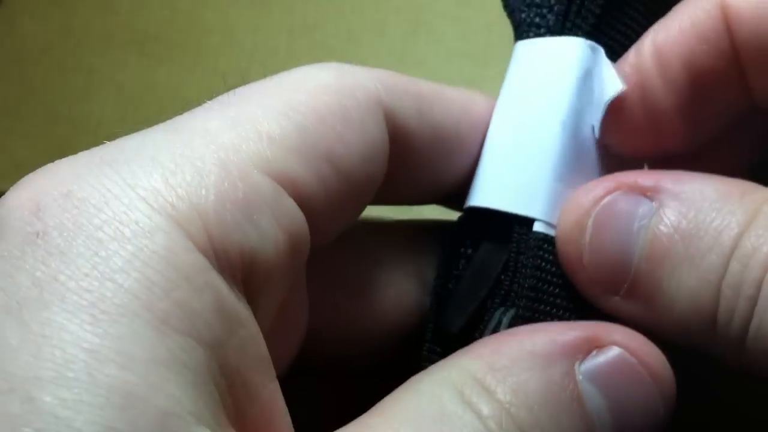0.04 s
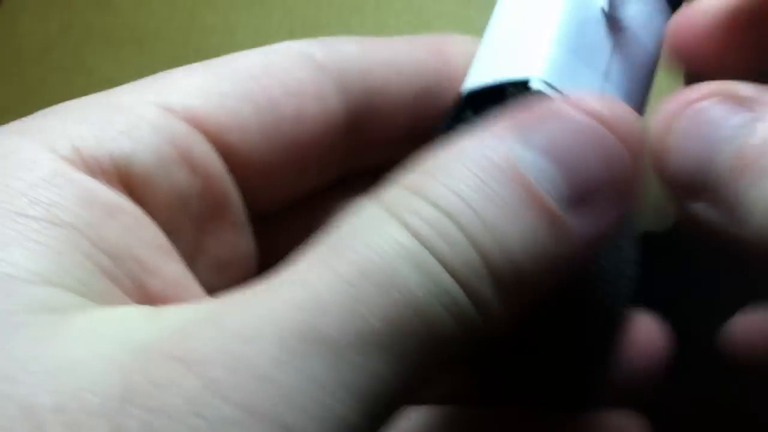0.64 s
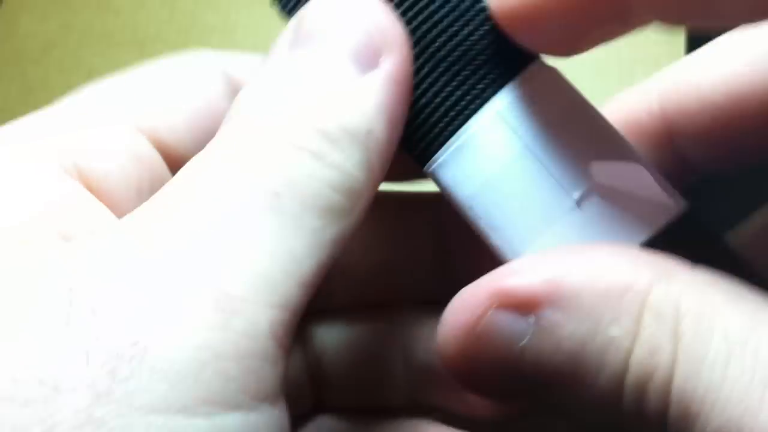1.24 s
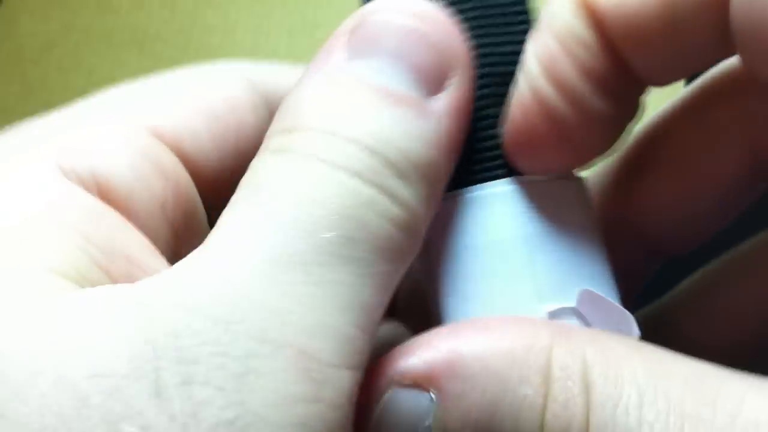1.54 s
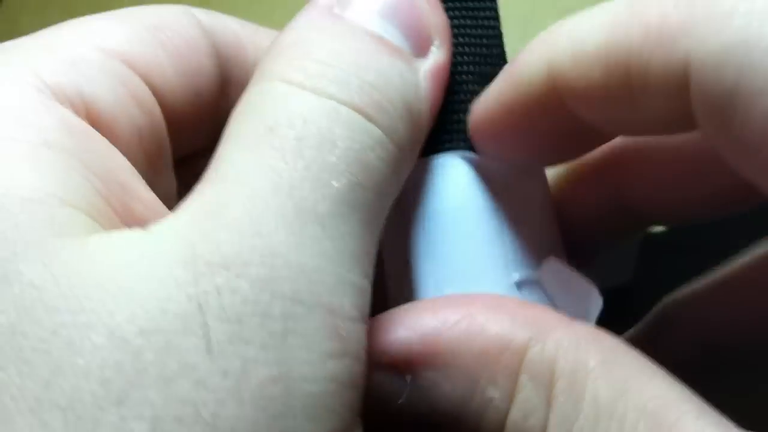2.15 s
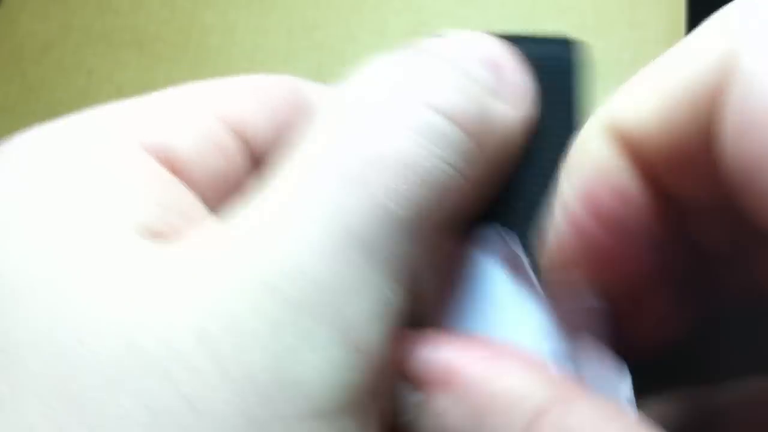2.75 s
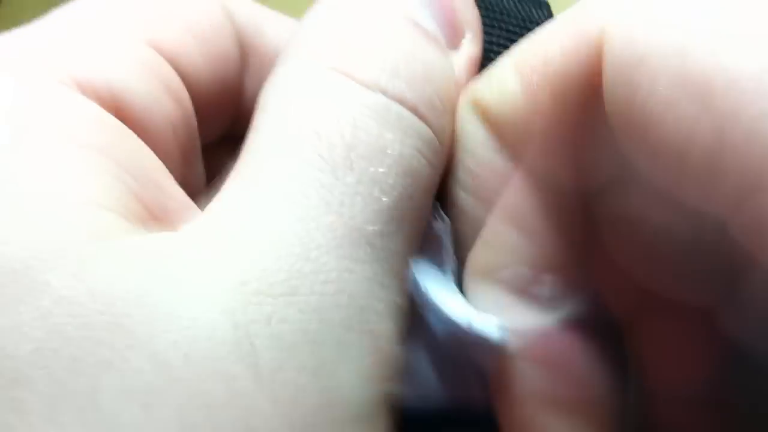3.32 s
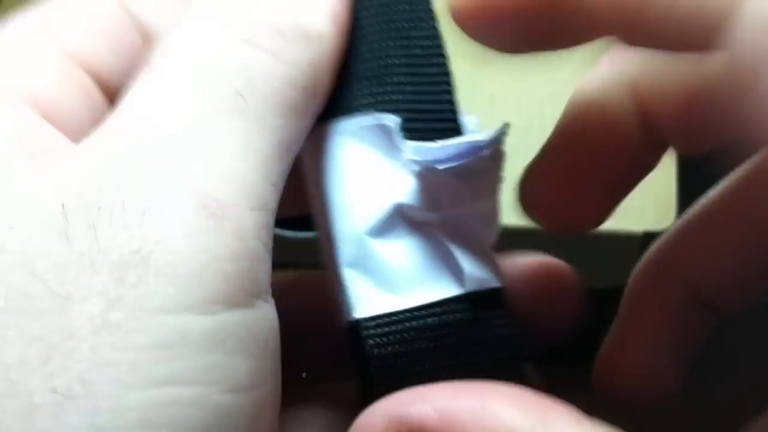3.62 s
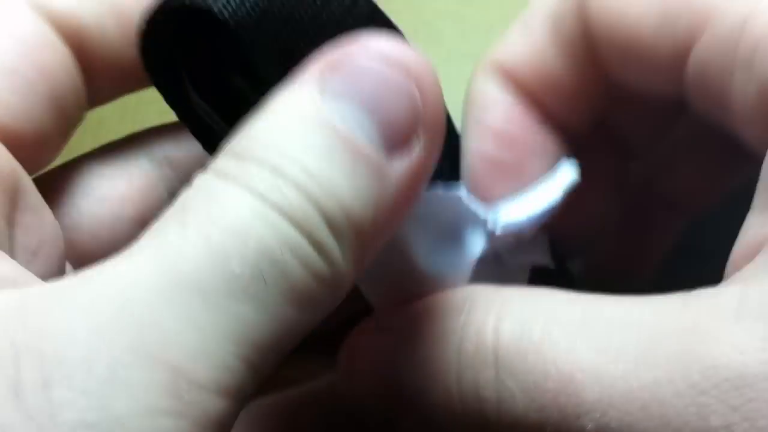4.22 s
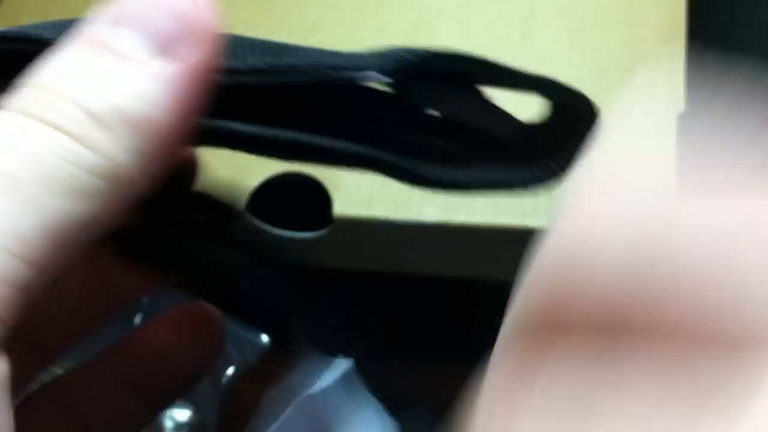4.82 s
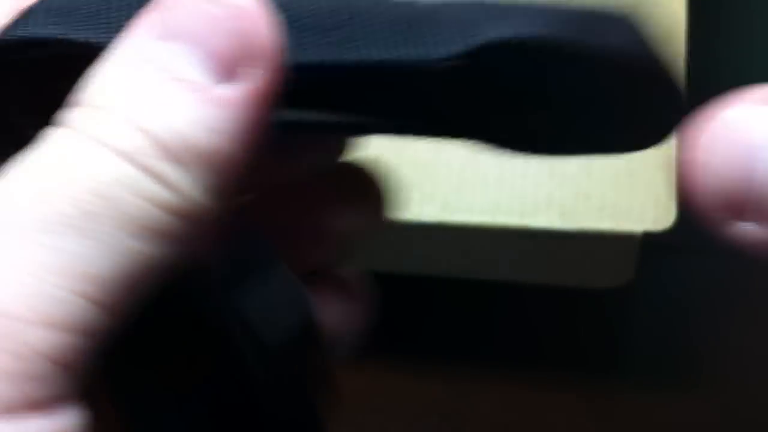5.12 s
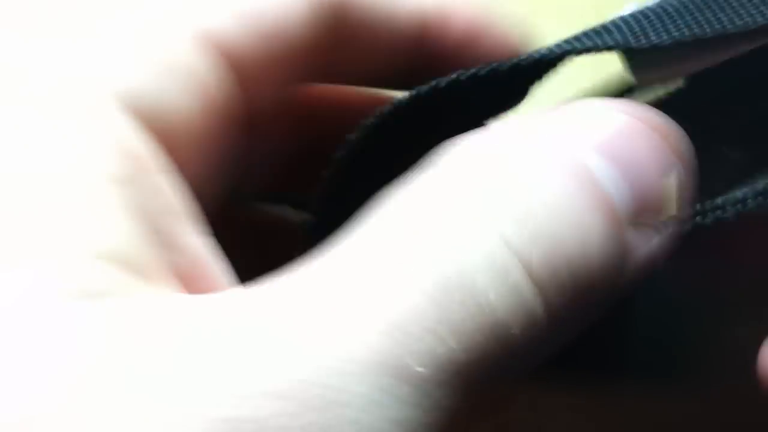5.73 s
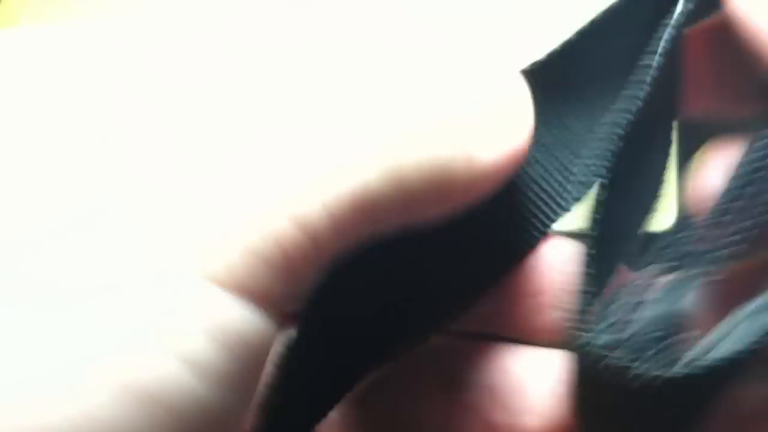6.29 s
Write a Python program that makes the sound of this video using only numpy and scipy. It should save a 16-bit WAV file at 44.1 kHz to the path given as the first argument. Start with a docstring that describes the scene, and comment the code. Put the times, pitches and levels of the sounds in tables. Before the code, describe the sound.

Fingers pick at a stiff paper band around a rolled nylon strap, making faint crinkles, short scratchy rips and scattered clicks. About halfway, the band gives way with a sharp snap, followed by a dull scuff and a busier run of tearing and crumpling. The strap then unrolls, its plastic buckles knocking on a cardboard box and its end dragging lightly. The microphone is close, in a small quiet room.

```python
"""Short scratchy rips and sharp snaps: fingers tear a paper band off a rolled nylon camera strap.
Stick-slip friction of skin and parting fibres makes the rips; the stiff paper buckles and rings.
The handling adds dull thuds and a scuff. Then the strap unrolls and its plastic buckles thud and
knock on a cardboard box, exciting its hollow modes. All is close to a phone in a small quiet room."""
import sys
import numpy as np
from scipy import signal
from scipy.fft import rfft, irfft
from scipy.io import wavfile

SR = 44100
rng = np.random.default_rng(int(sys.argv[2]) if len(sys.argv) > 2 else 0)


def digitize_waveform(pressure):
    """Quantize a signal to 16-bit integers and store it at the path in sys.argv[1].

    Rows of a 2-D input are taken as channels; values are limited to [-1, 1].
    """
    field = np.atleast_2d(pressure).T
    bounded = np.clip(field, -1, 1)
    quanta = np.round(bounded * 32767).astype(np.int16)
    wavfile.write(sys.argv[1], SR, quanta)


N = 284886
RESPONSE_SAMPLES = 8192  # length of a filter response or a single hit

# Levels are relative; bass and treble are set against the middle range of the same sound.
# Slides and rips of the paper. Each row: start in seconds, length in seconds, level in dB,
# bass in dB, treble in dB.
PAPER_STROKES = [(0.084, 0.035, -43.5, -26, -5), (0.385, 0.081, -62.5, -8, -4.5),
                 (0.875, 0.13, -58, -9.5, -9.5), (1.045, 0.089, -57.5, -10, -6),
                 (1.269, 0.056, -52.5, -6.5, -7.5), (1.382, 0.072, -64.5, -13, 1),
                 (1.807, 0.031, -54, -13, -3), (1.989, 0.069, -62.5, -7, 0), (2.085, 0.055, -59, -20, 1),
                 (2.195, 0.095, -58.5, -16, -3), (2.42, .012, -38.5, -12.5, 0),
                 (2.732, 0.16, -54.5, -15.5, -3), (2.887, 0.08, -60, -15, 2.5),
                 (2.988, 0.019, -54, -9.5, -2), (3.226, 0.092, -60.5, -8.5, -2.5),
                 (3.393, 0.0045, -26.5, -9, -8), (3.401, 0.051, -42, -22, 1),
                 (3.483, 0.039, -53.5, -19, -0.5), (3.604, 0.063, -64.5, 3.5, 7.5),
                 (3.739, 0.19, -59, -26, -6), (3.987, 0.041, -58.5, -19, -6.5),
                 (4.186, 0.088, -62, -8, -30), (4.269, 0.094, -43, -21, -4.5),
                 (4.356, 0.078, -52.5, -17, 2), (4.47, 0.041, -51, -8.5, -2.5),
                 (4.511, 0.031, -50.5, -18, 11.5), (4.573, 0.051, -62.5, -19, 2),
                 (4.644, 0.083, -50.5, -16, -1.5), (4.796, 0.13, -51, -2, 1.5),
                 (4.888, 0.015, -41, -17, -2), (5.287, 0.14, -63, -2.5, 3),
                 (5.957, 0.021, -54.5, -19, -2.5), (6.197, 0.014, -56, -22, -4),
                 (6.305, 0.032, -59, -5.5, 0)]
# The band buckles or gives way. Each row: time in seconds, level in dB, bass in dB, treble in dB,
# lower ring in Hz, upper ring in Hz.
PAPER_SNAPS = [(0.108, -44.5, -30, -4, 2630, 5270), (0.1178, -45.5, -15.5, -1.5, 2830, 5240),
               (0.3822, -34, -16, -1, 2700, 5600), (1.2327, -47, -22, -14, 2450, 7450),
               (1.5872, -58.5, -6, 0, 2590, 5500), (1.9735, -44, -9, 1.5, 2670, 6370),
               (2.4191, -27, -26.5, -2.5, 2350, 4600), (2.68, -63, -30, 11.5, 2480, 5940),
               (3.059, -59, -14, -1, 3300, 6850), (3.1525, -57.5, -16, 1.5, 1950, 7300),
               (3.1745, -55, -15, -6, 2600, 7020), (3.335, -54.5, -30, -1, 2950, 4530),
               (3.3964, -17, -21, -7, 2360, 6500), (3.3999, -24.5, -17, 1.5, 2590, 4900),
               (3.56, -51.5, -26, -12, 2860, 6000), (3.5863, -52, -13, -3, 2270, 7350),
               (3.599, -37, -27, -9.5, 2290, 5500), (3.72, -56, -2, -3, 2030, 5330),
               (4.271, -32.5, -10, -37, 2360, 5650), (4.3652, -24.5, -16.5, -7.5, 2530, 8700),
               (4.37, -40.5, 2.5, 10.5, 2480, 6500), (4.5644, -53, 0, 4.5, 2560, 5500),
               (4.669, -26, -18.5, 4, 2420, 5440), (4.938, -60, 10, 6.5, 2270, 9100),
               (4.9634, -39, -3.5, -5, 2800, 6000), (5.0146, -54, -2, -6.5, 2750, 6860),
               (5.3397, -51, -12.5, -18, 2440, 5400)]
# Buckles and strap strike the box. Each row: time in seconds, level in dB, bass in dB, treble in dB.
BUCKLE_KNOCKS = [(0.187, -62.5, 9.5, 2.5), (0.414, -54, 3, -3), (1.289, -63.5, -3, 2),
                 (2.841, -57, -16, -15), (3.4185, -47.5, -15, -13.5), (5.384, -28, -5.5, -19.5),
                 (5.428, -44, -20, 7), (5.481, -51, -2, 3.5), (5.5021, -37, -13.5, 1.5),
                 (5.576, -46, -19, -1.5), (5.714, -41, -12, -34), (6.419, -48, -7, -29)]
# The strap drags over the box. Each row: start in seconds, length in seconds, level in dB.
STRAP_DRAGS = [(5.68, 0.21, -54.5), (6.333, 0.15, -57)]
# Dull low thuds: hands bumping the roll, and a buckle landing on the box.
# Each row: time in seconds, level in dB, pitch in Hz.
LOW_THUDS = [(0.384, -47.5, 158), (0.636, -57, 225), (1.516, -61, 214), (1.586, -56.5, 204),
             (2.69, -59.5, 215), (3.402, -45.5, 200), (3.785, -51, 313), (3.823, -41, 293),
             (4.369, -50, 203), (4.873, -53.5, 181), (5.382, -35.5, 308), (5.413, -49, 318),
             (5.898, -53.5, 230), (6.077, -53, 236), (6.278, -56, 230)]
# Envelopes of a dull scuff and of the fingers' light grazing. Each row: time in seconds, level in dB.
SCUFF_ENVELOPE = [(3.76, -88), (3.772, -90), (3.818, -45.5), (3.884, -41.5), (3.962, -59.5), (4.052, -66),
                  (4.24, -59.5)]
GRAZE_ENVELOPE = [(0.0, -53), (0.16, -65.5), (0.81, -66), (1.1, -59.5), (1.76, -68.5), (2.23, -62.5),
                  (2.77, -68), (2.88, -60.5), (3.52, -63), (3.94, -70.5), (4.25, -61.5), (4.43, -57.5),
                  (4.8, -63), (5.07, -63.5), (5.34, -72), (5.52, -53.5), (6.1, -61.5), (6.46, -59)]
# Resonances of the box and of the scuff. Each row: frequency in Hz, nominal width in Hz, gain in dB.
CARDBOARD_MODES = [(204, 71, -23), (304, 35, -3.5), (459, 37, -4), (745, 190, 6), (933, 160, -3),
                   (1164, 90, -12), (1650, 120, -12.5), (2050, 390, -8.5), (2900, 550, -18.5)]
SCUFF_RESONANCES = [(110.6, 18, 3.5), (283, 126, 5.5), (405, 83, -7.5), (585, 100, -19), (1125, 29, 0),
                    (1355, 133, 2), (1930, 210, -10.5)]
# Spectra of rubbed paper, snapping paper, a knock and the room's hush.
# Each row: frequency in Hz, level in dB.
RUB_SPECTRUM = [(100, -26), (320, -13.5), (800, -17), (1300, -14), (1800, -8.5), (2450, 2), (2800, -5),
                (3200, -3), (4000, -15.5), (5400, -6.5), (8300, -10.5), (10500, -17.5), (14000, -23.5),
                (16000, -49.5)]
CRACK_SPECTRUM = [(80, -25), (300, -20.5), (650, -11.5), (950, -13), (1350, -9.5), (1800, -2.5),
                  (2450, -0.5), (2850, -8.5), (3250, 3.5), (3900, -8), (6300, -7), (8500, -7), (11000, -10),
                  (16000, -17.5)]
CLACK_SPECTRUM = [(60, -32), (280, 9), (3200, -3), (4500, -18), (8000, -12.5), (15000, -17)]
HUSH_SPECTRUM = [(25, -8.5), (60, -21), (130, -1), (300, -4), (500, -9), (900, -13), (1300, -10.5),
                 (1750, -14), (2450, -22), (3900, -18.5), (7000, -22.5), (16000, -33.5)]


def paper_rips(catch_db=3.5, tilt=0.26):
    """Stick-slip friction: fibres catch and let go over the hiss of skin sliding on paper."""
    out = np.zeros(N)
    catching = undb(catch_db * waver(rate_hz=190))
    fibres = catching * (slips(rate_hz=1300, spread_db=4) + rng.standard_normal(N))
    grips_db = rng.standard_normal((len(PAPER_STROKES), len(RUB_SPECTRUM)))
    for (start, length, db, bass_db, treble_db), grip_db in zip(PAPER_STROKES, grips_db):
        speed = stroke(length, 0)
        friction = speed * fibres[int(start * SR):][:len(speed)]
        # Every grip damps the sheet differently, and a bright pull reaches further into the top.
        sheet = colour(friction, brighten(RUB_SPECTRUM, tilt * (treble_db + 11.5), grip_db))
        add(out, start, undb(db) * balance(sheet, bass_db, treble_db, 1390, 4800))
    return out


def paper_snaps(band_parts_s=3.39, taut_t60_s=0.024, slack_t60_s=0.014, tilt=0.36):
    """Snap-through buckling: a facet of stiff paper flips and rings at pitches set by its size."""
    out = np.zeros(N)
    for s, db, bass_db, treble_db, lower_hz, upper_hz in list(PAPER_SNAPS) + creases():
        t60 = taut_t60_s if s < band_parts_s else slack_t60_s
        # Loud snaps come from large, slow facets and have less top than tiny ones.
        crack = colour(burst(t60, tick=0.53), brighten(CRACK_SPECTRUM, -tilt * (db + 42)))
        lower_ring = resonate(resonate(crack, lower_hz, 830), lower_hz, 830)
        upper_ring = resonate(crack, upper_hz, 800)
        facet = crack + 4.1 * lower_ring + 4.05 * upper_ring
        add(out, s, scale_hit(balance(facet, bass_db, treble_db, 1320, 3960), db))
    return out


def creases(count=80, rate_hz=8, scatter_db=5.5, scatter_octaves=0.2, bass_db=-11, treble_db=-2.5):
    """Random buckling: small creases give way, louder under harder rubbing. Rows as in PAPER_SNAPS."""
    gaps, sizes, pitches = np.clip(rng.standard_normal((count, 3)).T, -2, 2)
    times = np.cumsum(np.exp(gaps / 2)) / rate_hz
    levels = np.interp(times, *np.transpose(GRAZE_ENVELOPE)) - 0.5 + scatter_db * sizes
    rings_hz = np.outer(2 ** (scatter_octaves * pitches), (2430, 6000))
    return [(s, db, bass_db, treble_db, *hz) for s, db, hz in zip(times, levels, rings_hz) if s < N / SR]


def buckle_knocks(clack_gain=0.027):
    """Impact excitation: plastic clacks on cardboard, and the hollow box rings briefly."""
    out = np.zeros(N)
    for s, db, bass_db, treble_db in BUCKLE_KNOCKS:
        contact = burst(t60=0.046, tick=0.21)
        knock = colour(box(contact) + clack_gain * contact, CLACK_SPECTRUM)
        add(out, s, scale_hit(balance(knock, bass_db, treble_db, 458, 2000), db))
    return out


def box(force):
    """Modal superposition: the cardboard box answers a force with the sum of its resonances."""
    return sum(undb(db) * resonate(force, hz, width) for hz, width, db in CARDBOARD_MODES)


def strap_drag():
    """Frictional excitation: the strap's loose end scrapes the box and drives its modes."""
    speed = np.zeros(N)
    for start, length, db in STRAP_DRAGS:
        add(speed, start, stroke(length, db))
    scrape = box(slips(rate_hz=1400, spread_db=0.65))
    return speed * unit(resonate(scrape, hz=610, width_hz=850))


def low_thuds(width_hz=110):
    """Damped impact: a hand on the roll, or a buckle landing on the box, gives a short low thud."""
    out = np.zeros(N)
    for s, db, hz in LOW_THUDS:
        contact = burst(t60=0.11, tick=0.53)
        thud = resonate(resonate(contact, hz, width_hz), hz, 3 * width_hz)
        add(out, s, scale_hit(unit(thud), db))
    return out


def scuff(level_db=-2, catch_db=3, widening=1.4):
    """Resonant filtering: coarse stick-slip rubbing is heard through a few hollow resonances."""
    catching = undb(catch_db * waver(rate_hz=90))
    friction = catching * (slips(rate_hz=380, spread_db=3) + 0.28 * rng.standard_normal(N))
    body = sum(undb(db) * resonate(resonate(friction, hz, widening * width), hz, widening * width)
               for hz, width, db in SCUFF_RESONANCES)
    return undb(level_db) * envelope(SCUFF_ENVELOPE) * unit(body)


def finger_graze(level_db=-1, shift_db=3):
    """Light friction: the paper crinkles faintly while the fingers shift their grip."""
    friction = slips(rate_hz=700, spread_db=3.6) + 0.7 * rng.standard_normal(N)
    grip = undb(level_db + shift_db * waver(rate_hz=24))
    return grip * envelope(GRAZE_ENVELOPE) * unit(colour(friction, RUB_SPECTRUM))


def room(x, t60=0.26, wet_db=-19, gap_s=0.014):
    """Reverberation: desk and walls return a faint tail that decays exponentially."""
    t = np.arange(2 * RESPONSE_SAMPLES) / SR
    tail = rng.standard_normal(len(t)) * np.exp(-np.log(1000) * t / t60) * (t > gap_s)
    tail /= np.linalg.norm(tail)
    tail = colour(tail, [(100, 6), (500, 4.5), (2500, -7), (6000, -2), (15000, -7)])
    return x + undb(wet_db) * signal.fftconvolve(x, tail)[:N]


def hush(level_db=-69.5):
    """Stationary noise: the quiet room has a steady low hush."""
    return undb(level_db) * unit(colour(rng.standard_normal(N), HUSH_SPECTRUM))


def slips(rate_hz, spread_db):
    """A Poisson process of tiny slips: many faint, a few strong."""
    sizes = undb(spread_db * np.minimum(rng.exponential(size=N), 3.2))
    slipping = rng.random(N) < rate_hz / SR
    return unit(slipping * sizes * rng.choice([-1, 1], N))


def stroke(length, db):
    """Amplitude envelope of one rubbing stroke: it takes hold, builds up and lets go."""
    progress = np.linspace(0, 1, int(length * SR))
    swell_db = np.interp(progress, [0, 0.19, 0.66, 1], [-4, -4, 0, -4])
    return undb(db + swell_db) * signal.windows.tukey(len(progress), 0.3)


def burst(t60, tick):
    """A transient: a sharp tick, then an irregular shudder that falls 60 dB in t60 seconds."""
    t = np.arange(RESPONSE_SAMPLES) / SR
    shudder = rng.standard_normal(len(t)) * np.exp(-np.log(1000) * t / t60)
    shudder /= np.linalg.norm(shudder)
    shudder[0] += tick
    return shudder


def waver(rate_hz):
    """Random modulation: a line through rate_hz bounded random values a second."""
    values = np.clip(rng.standard_normal(RESPONSE_SAMPLES), -2, 2)
    return np.interp(np.arange(N) / SR * rate_hz, np.arange(len(values)), values)


def resonate(x, hz, width_hz):
    """A second-order resonance, with gain 1 at its centre."""
    return signal.lfilter(*signal.iirpeak(hz, hz / width_hz, fs=SR), x)


def colour(x, spectrum):
    """Minimum-phase filtering by a spectrum of (Hz, dB) points."""
    hz, db = np.transpose(spectrum)
    half = RESPONSE_SAMPLES // 2
    grid_hz = np.linspace(1, SR / 2, half + 1)
    gain = undb(np.interp(np.log(grid_hz), np.log(hz), db))
    cepstrum = irfft(np.log(gain))
    cepstrum[1:half] *= 2  # folding onto positive time makes the filter causal
    cepstrum[half + 1:] = 0
    response = irfft(np.exp(rfft(cepstrum)))
    return signal.fftconvolve(x, response)[:len(x)]


def brighten(spectrum, db_per_octave, offsets_db=0, corner_hz=5800):
    """Spectral tilt above a corner frequency, plus an offset at each point."""
    hz, db = np.transpose(spectrum)
    octaves_above = np.log2(np.maximum(hz / corner_hz, 1))
    return np.transpose([hz, db + offsets_db + db_per_octave * octaves_above])


def balance(x, bass_db, treble_db, low_hz, high_hz):
    """Three-band equalisation: the middle at rms 1, with bass and treble set against it."""
    bands = ((low_hz, "low", bass_db), ([low_hz, high_hz], "band", 0), (high_hz, "high", treble_db))
    return sum(undb(db) * unit(signal.sosfilt(signal.butter(4, hz, kind, fs=SR, output="sos"), x))
               for hz, kind, db in bands)


def envelope(rows):
    """Gain at every sample from (seconds, dB) rows; silent outside them."""
    return undb(np.interp(np.arange(N) / SR, *np.transpose(rows), left=-np.inf, right=-np.inf))


def scale_hit(sound, db):
    """Equal energy: a hit of rms 1 gets the energy of 10 ms at the given level."""
    return sound * undb(db) * np.sqrt(0.01 * SR / RESPONSE_SAMPLES)


def add(out, s, sound):
    """Superposition: mix a sound in at s seconds."""
    start = max(int(s * SR), 0)
    out[start:start + len(sound)] += sound[:max(N - start, 0)]


def undb(db):
    """Decibels to amplitude ratio."""
    return 10 ** (np.asarray(db) / 20)


def unit(x):
    """Normalisation to rms 1."""
    return x / np.sqrt(np.mean(x ** 2) + 1e-20)


def scene():
    """Superposition: paper and strap sound together in the room, over its steady hush."""
    paper = undb(-0.25) * paper_rips() + finger_graze() + undb(-0.83) * paper_snaps()
    strap = undb(0.2) * buckle_knocks() + strap_drag() + low_thuds() + scuff()
    return (room(paper + strap) + hush())[None]


def record(dry, bass_hz=75, top_hz=16200):
    """Band limiting: the phone thins the deep bass and cuts the top."""
    thin = signal.sosfilt(signal.butter(2, bass_hz, "high", fs=SR, output="sos"), dry)
    return signal.sosfiltfilt(signal.ellip(8, 0.1, 60, top_hz, fs=SR, output="sos"), thin)


dry = scene()
out = record(dry)
digitize_waveform(out)
```